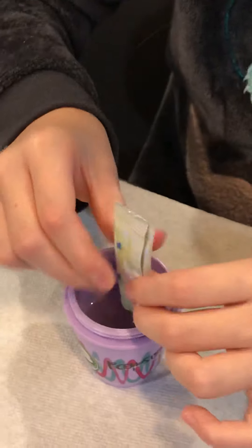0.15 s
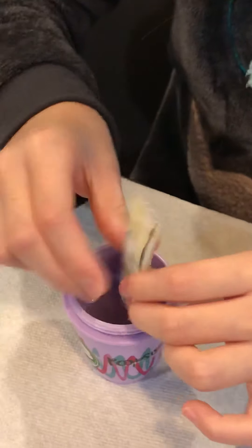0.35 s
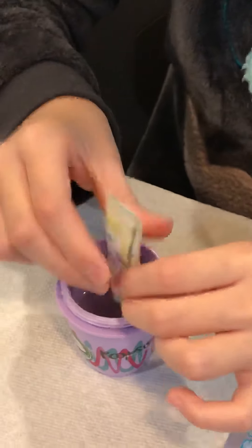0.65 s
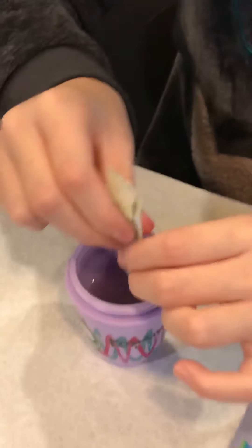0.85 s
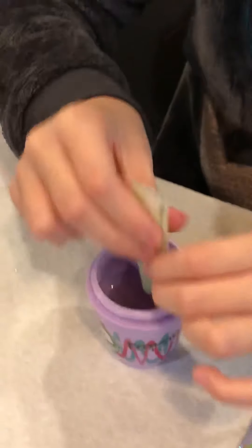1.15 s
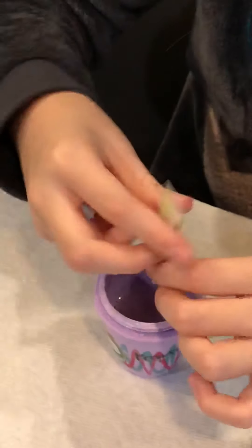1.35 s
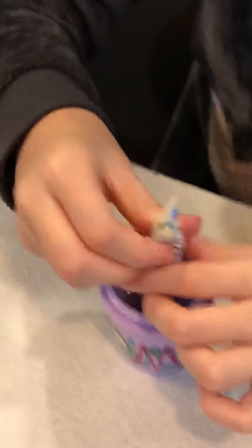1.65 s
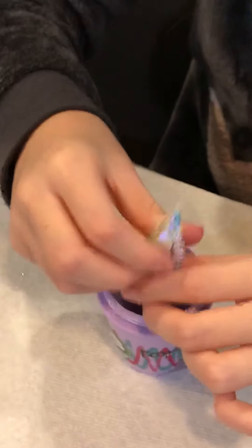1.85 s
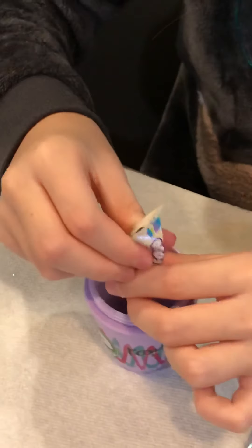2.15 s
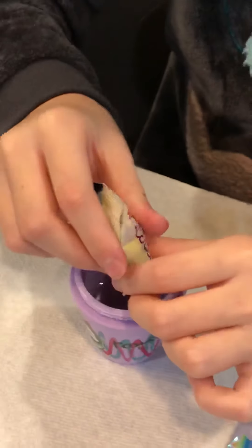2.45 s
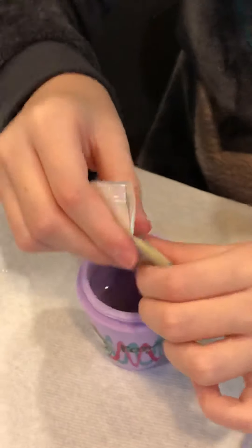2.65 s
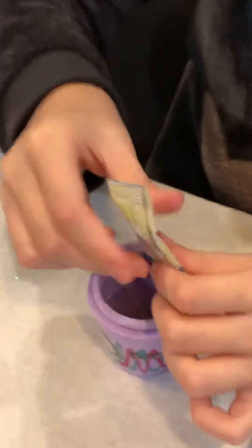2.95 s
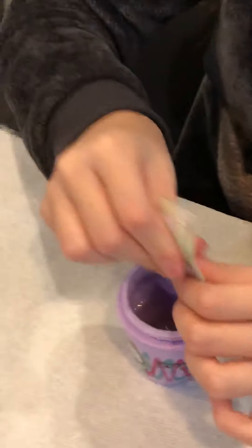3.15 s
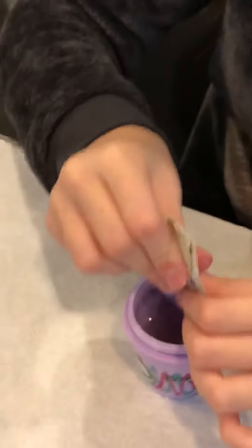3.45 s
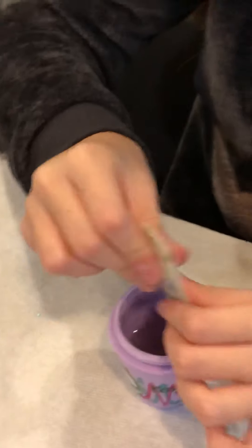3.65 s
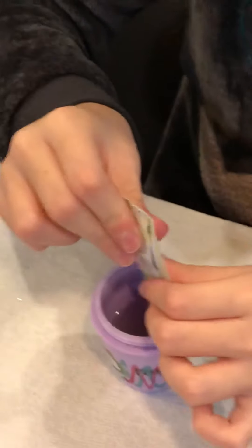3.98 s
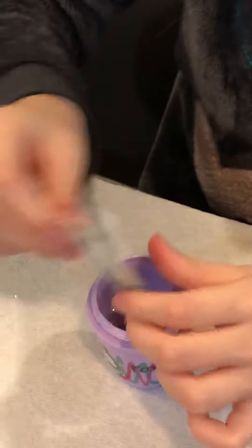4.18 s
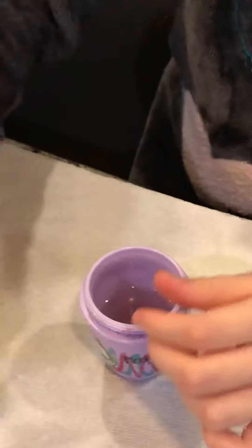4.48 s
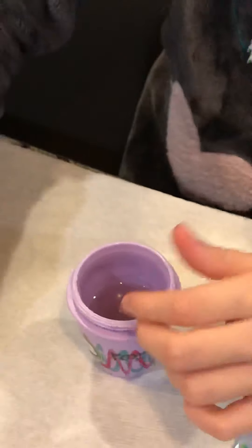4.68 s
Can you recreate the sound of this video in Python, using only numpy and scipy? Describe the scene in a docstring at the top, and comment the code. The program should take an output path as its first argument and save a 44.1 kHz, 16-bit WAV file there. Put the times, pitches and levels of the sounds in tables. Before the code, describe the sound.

Fingers squeeze a small foil sachet close to the microphone in a quiet room. It buckles in sharp, irregular snaps with fine crackling between them. The table gives a soft, dull knock. As the crinkling goes on, powder is shaken out in three very faint trickles, with one tap on a plastic cup. At the end the foil stops and the cup clicks lightly.

```python
"""A quiet room with a faint mains hum; one microphone close to a small foil sachet over a plastic cup.
From the start the sachet is squeezed: its walls buckle in sharp snaps, tiny creases crackle around them,
the foil slides under the fingers and the room rings briefly. Near 1.8 s the table gives a dull knock.
From 3 s powder is shaken out in three thin trickles, with one knock on the cup among them.
At the end the cup is nudged and clicks."""
import sys
import numpy as np
from scipy import signal
from scipy.fft import rfft, irfft, next_fast_len
from scipy.io import wavfile
from scipy.ndimage import map_coordinates

SR = 44100
rng = np.random.default_rng(int(sys.argv[2]) if len(sys.argv) > 2 else 0)


def unload_audio(sound):
    """Save the sound as a 16-bit wav file, at the path given as the first command line argument."""
    columns = np.transpose(np.atleast_2d(sound))
    # keep every value between -1 and 1, then stretch to whole-number steps
    steps = np.round(np.clip(columns, -1, 1) * 32767)
    wavfile.write(sys.argv[1], SR, steps.astype(np.int16))


N = 212383

# the foil buckles: start_s, level_db, wall_db, edge_db (both relative to the level), patch_hz
BUCKLES = [(0.0449, -45, 1, -35, 3310), (0.1659, -38, -8.5, -4, 3400), (0.2836, -50.5, -6, -5, 3300),
           (0.2959, -44.5, 2.5, -15, 3380), (.4141, -49, -1, -17, 3230), (0.4261, -38, -5, -1.5, 3000),
           (0.5518, -47, 7, -4.5, 5430), (.7097, -29.5, -12, 1.5, 3130), (0.72, -41.5, 1.5, .5, 4100),
           (.7331, -43.5, -4.5, -7, 2920), (0.8576, -39.5, 3, -2, 5400), (1.0305, -51, -2.5, -1, 2550),
           (1.0371, -28.5, -21, -2.5, 3300), (1.0438, -43.5, -1, -3, 4900), (1.0546, -34, -8, -5.5, 2880),
           (1.134, -52.5, -3, -5, 5500), (1.159, -52, -4, -3, 2300), (1.1824, -51.5, -1, -7.5, 4580),
           (1.2553, -50.5, -0.5, -22, 2580), (1.2657, -34.5, -7, 1, 5460), (1.286, -46.5, -2, 1, 3460),
           (1.4274, -53.5, 6.5, -5, 3220), (1.476, -61, 3.5, -12, 3110), (1.5567, -51.5, 4, -7, 3100),
           (1.6055, -36.5, -2.5, -9.5, 2770), (1.949, -37, -4, -4.5, 2860), (2.117, -66, 16.5, -12, 2700),
           (2.3014, -36, -3.5, -4, 2730), (2.4476, -47.5, -0.5, 5, 5100), (2.4741, -58.5, 16, -20, 2830),
           (2.6634, -49, 8, -18, 3550), (2.697, -31, -4.5, -13, 2700), (2.7987, -35, -6.5, 1.5, 2200),
           (2.822, -43.5, -1, 2, 2700), (3.0006, -45.5, -14, 1.5, 2500), (3.0205, -44, -11, -3.5, 3530),
           (3.0822, -57, -7, -4.5, 3460), (3.2183, -61.5, -20, 8.5, 3900), (3.2971, -41.5, -6, -20, 4100),
           (3.3042, -45.5, -11, 2.5, 4950), (3.406, -42, 8.5, 2.5, 4700), (3.583, -56, -3.5, -21, 3630),
           (3.606, -49, -13, -7, 3980), (3.6155, -45, -8, -10, 4070), (3.6204, -43, -2, 4, 2700),
           (3.656, -37, -10.5, -8.5, 2650), (3.7102, -43, 2.5, 1.5, 4800), (3.8707, -38.5, -7.5, -2, 3460),
           (3.892, -42, -11.5, -14, 2650), (3.9773, -40.5, -3, -5, 5130), (4.1499, -43, -13, 3, 5240),
           (4.1798, -51.5, -12, -3, 2720), (4.2279, -51, 0.5, -19, 4630), (4.2463, -55.5, 1, -18, 2800),
           (4.3887, -58, -27, -1, 5530)]
# modes of the sachet's stiff walls: pitch_hz, level_db, t60_s
FOIL_MODES = [(646, 0, 0.0024), (1026, -7.5, 0.0094), (1560, -12, 0.0095), (1796, -0.5, 0.013),
              (2700, 4, 0.0062), (3325, -4, 0.014), (4450, -8.5, 0.01), (5330, -10.5, 0.024)]


def amp(db):
    """Decibels to gain."""
    return 10 ** (np.asarray(db) / 20)


def unit(x):
    """Scale to rms 1."""
    return x / np.sqrt(np.mean(x ** 2) + 1e-20)


def along(points, hz):
    """Read (frequency_hz, value) points on a log frequency axis."""
    point_hz, values = np.transpose(points)
    return np.interp(np.log(hz + 1), np.log(point_hz + 1), values)


def filtered(x, response):
    """Filter by a gain given as a function of frequency."""
    size = next_fast_len(N + SR // 2)
    return irfft(rfft(x, size) * response(np.fft.rfftfreq(size, 1 / SR)), size)[:N]


def coloured(x, points):
    """Causal filter through (frequency_hz, gain_db) points."""
    size = 2048
    cepstrum = irfft(np.log(amp(along(points, np.fft.rfftfreq(size, 1 / SR)))))
    cepstrum[1:size // 2] *= 2  # folding gives minimum phase
    cepstrum[size // 2 + 1:] = 0
    return signal.oaconvolve(x, irfft(np.exp(rfft(cepstrum))))[:N]


def wobble(rate_hz):
    """A smooth random curve with rate_hz knots a second."""
    knots = rng.standard_normal(int(N * rate_hz / SR) + 4)
    return map_coordinates(knots, [np.arange(N) * rate_hz / SR])


def swells(rows):
    """A smooth rise and fall for each (peak_s, level_db, half_length_s)."""
    t = np.arange(N) / SR
    return sum(amp(db) * np.exp(-.5 * ((t - peak_s) / half_s) ** 2) for peak_s, db, half_s in rows)


def add(track, start_s, sound):
    """Mix a sound into the track."""
    start = max(0, round(start_s * SR))
    track[start:start + len(sound)] += sound[:len(track) - start]


def ring(modes, detune, scatter_db, crack_db, crack_t60_s):
    """One blow: a brief crack and the modes, at new strengths and slightly new pitches."""
    t = np.arange(SR // 30) / SR
    hz, db, t60 = np.transpose(modes)[:, :, None]
    pitch, size, side = rng.standard_normal((3, len(modes), 1))
    decays = amp(db + scatter_db * size - 60 * t / t60)
    tones = np.sign(side) * decays * np.sin(2 * np.pi * hz * (1 + detune * pitch) * t)
    crack = amp(crack_db - 60 * t / crack_t60_s) * rng.standard_normal(len(t))
    onset = 1 - np.exp(-t / 0.000072)  # the flip takes a moment to gather speed
    return (tones.sum(0) + crack) * onset


def voiced(blow, level_db, thud_db, wall_db, edge_db):
    """The size of the moving patch sets a blow's balance; band levels hold over its first 4 ms."""
    # thud, wall, patch and edge bands: low_hz, high_hz
    bands = [(540, 1150), (1480, 2050), (2450, 6000), (6000, 17000)]
    out = np.zeros(len(blow))
    for edges, db in zip(bands, (thud_db, wall_db, 0, edge_db)):
        band = signal.sosfilt(signal.butter(3, edges, "bandpass", fs=SR, output="sos"), blow)
        out += amp(level_db + db) * band / np.std(band[:SR // 250])
    return out


def room_tone():
    """Steady room noise and a slightly wavering mains hum."""
    # spectrum of the room noise: frequency_hz, density_db
    air_colour = [(20, -49), (45, 3), (90, 1), (170, -0.5), (280, -2.5), (450, -6), (1000, -12.5),
                  (2500, -18.5), (6000, -24.5), (15500, -27.5), (16500, -33)]
    # partials of the hum: pitch_hz, rms_db
    partials = [(58.5, -74.5), (116.5, -75), (232.5, -78)]
    t = np.arange(N) / SR
    air = unit(filtered(rng.standard_normal(N), lambda hz: amp(along(air_colour, hz))))
    hum = np.zeros(N)
    for hz, db in partials:
        peak = np.sqrt(2) * amp(db + 1.2 * wobble(5.5))
        hum += peak * np.sin(2 * np.pi * hz * t + .5 * wobble(4.11))
    return amp(-66) * air + hum


def room_tail(x):
    """The room's diffuse ring, new every quarter second as the hands move."""
    # decay of the room: frequency_hz, t60_s
    decay = [(300, 0.19), (1000, 0.34), (3000, 0.38), (7000, 0.68), (15000, 0.15)]
    # colour of the tail: frequency_hz, gain_db
    colour = [(200, -10), (1000, 11), (3000, 7), (6000, 0), (10000, -3), (16000, 8)]
    out = np.zeros(N)
    for start in range(0, N, SR // 4):
        hz, t, noise = signal.stft(rng.standard_normal(SR // 2), SR, nperseg=256)
        fade = amp(along(colour, hz)[:, None] - 60 * t / along(decay, hz)[:, None])
        onset = 1 - np.exp(-t / 0.00055)
        tail = signal.istft(noise * fade * onset, SR, nperseg=256)[1]
        add(out, start / SR, signal.fftconvolve(x[start:start + SR // 4], tail / np.linalg.norm(tail)))
    return out


def echoes(x):
    """Surfaces near the microphone answer first, a little duller."""
    # early reflections: delay_s, gain_db
    reflections = [(.0032, -22), (.0068, -21), (.0092, -28.5), (0.0106, -18.5), (0.022, -21)]
    out = np.zeros(N)
    dull = filtered(x, lambda hz: 1 / (1 + 1j * hz / 7000))
    for delay_s, db in reflections:
        add(out, delay_s, amp(db) * dull)
    return out


def knocks():
    """A soft contact sets one low mode swinging for a few cycles."""
    # dull knocks through the table and the cup: start_s, level_db, pitch_hz, t60_s
    contacts = [(1.785, -45.5, 53.3, 0.17), (3.4064, -31.5, 516, 0.012)]
    out = np.zeros(N)
    t = np.arange(SR // 3) / SR
    for start_s, db, hz, t60 in contacts:
        envelope = amp(db - 60 * t / t60) * (1 - np.exp(-2 * hz * t))
        add(out, start_s, envelope * np.sin(2 * np.pi * hz * t))
    return out


def powder():
    """Very fine grains run down inside the sachet and brush the foil with a thin, high fizz."""
    # trickles: peak_s, level_db
    trickles = [(2.998, -63), (3.145, -64), (4.14, -63)]
    half_length_s = 0.02
    grains = rng.standard_normal(N) ** 3  # cubing makes the noise spiky
    fizz = unit(filtered(grains, lambda hz: np.exp(-.5 * ((hz - 14800) / 2200) ** 2)))
    return fizz * swells([(peak_s, db, half_length_s) for peak_s, db in trickles])


def cup_clicks():
    """The light plastic cup clicks as the hand shifts on it."""
    # nudges: start_s, level_db, wall_db (relative to the level)
    nudges = [(4.5888, -67, 5), (4.7174, -35.5, -17), (4.7553, -43.5, -17)]
    # modes of the rim and wall: pitch_hz, level_db, t60_s
    cup_modes = [(780, -15, 0.031), (1186, -11, 0.019), (1830, -21, 0.015), (2500, -13, 0.014),
                 (3220, 0, 0.016), (3460, 1, 0.0095), (4370, -11, 0.0091), (7560, -11, 0.0042)]
    out = np.zeros(N)
    for start_s, level_db, wall_db in nudges:
        blow = ring(cup_modes, detune=0.0056, scatter_db=1.5, crack_db=-11.5, crack_t60_s=0.0077)
        add(out, start_s, voiced(blow, level_db, thud_db=wall_db - 1.5, wall_db=wall_db, edge_db=-16))
    return out


def creases(per_second, spread_db):
    """Countless tiny creases flip, a few much larger than the rest, in several colours; rms 1."""
    colours = 20
    chance, size, kind = rng.random(N), rng.exponential(size=N), rng.random(N)
    flips = (chance < per_second / SR) * amp(spread_db * np.minimum(size, 2.5))
    out = np.zeros(N)
    for colour in range(colours):
        tick = ring(FOIL_MODES, detune=0.065, scatter_db=8.0, crack_db=11.5, crack_t60_s=0.0098)
        out += signal.oaconvolve(flips * (np.floor(colours * kind) == colour), tick)[:N]
    return unit(out)


def strain(rise_s, fall_s):
    """Stress builds before each buckle and settles after it, more so the further the wall swings."""
    wall_share = 0.15
    out = np.zeros(N)
    t = np.arange(-(SR // 12), SR // 12) / SR
    swell = np.exp(np.minimum(t / rise_s, -t / fall_s))
    for start_s, level_db, wall_db, *_ in BUCKLES:
        add(out, start_s + t[0], amp(level_db + wall_share * wall_db) * swell[t >= -start_s])
    return out


def rustle():
    """Sparse crackle as the foil is worked and settles, dense crackle as it slides and gives way."""
    # how hard the fingers work the sachet: time_s, level_db
    handling = [(0, -59.5), (.65, -83), (1.1, -62), (1.65, -60.5), (1.85, -70.5), (2.2, -70.5), (2.5, -57),
                (2.92, -68.5), (3.5, -62), (4.25, -67.5), (4.5, -78), (4.55, -100)]
    # foil sliding under the fingers: peak_s, level_db, half_length_s
    slides = [(.007, -57.5, 0.048), (.161, -42.5, 0.0064), (.548, -55, 0.015), (.853, -52, 0.0066),
              (1.15, -61, 0.0078), (1.27, -50, 0.01), (1.445, -52.5, 0.0082), (1.904, -58, 0.0024),
              (1.945, -52, 0.01), (2.292, -51.5, 0.01), (2.47, -49.5, 0.0063), (2.658, -51.5, 0.0068),
              (2.999, -53.5, 0.0085), (3.121, -56, 0.0085), (3.303, -48, 0.0094), (3.396, -53.5, 0.0056),
              (3.7, -49, 0.007), (3.862, -53, 0.01), (4.13, -58, 0.019), (4.26, -55.5, .04),
              (4.309, -45, 0.0044), (4.442, -55.5, .0032)]
    handling_db = np.interp(np.arange(N) / SR, *np.transpose(handling))
    working = amp(handling_db + 0.54 * wobble(14) - 7.0)
    settling = amp(-19.5) * strain(rise_s=0.0047, fall_s=0.014)
    sliding = amp(-0.5) * swells(slides)
    giving_way = amp(-11) * strain(rise_s=0.0034, fall_s=0.0064)
    sparse = (working + settling) * creases(per_second=110, spread_db=8.0)
    dense = (sliding + giving_way) * creases(per_second=650, spread_db=4.0)
    return sparse + dense


def snaps(crack_db, wall_gain_db):
    """Each buckle rings the flipping patch and the sachet, whose shape changes a little every time."""
    thud_loss = 0.19  # dB of thud lost per dB that a buckle is harder than usual
    usual_db = np.mean(BUCKLES, axis=0)[1]
    out = np.zeros(N)
    for start_s, level_db, wall_db, edge_db, patch_hz in BUCKLES:
        modes = FOIL_MODES + [(patch_hz, 9, 24 / patch_hz)]  # small, high patches die sooner
        blow = ring(modes, detune=0.0056, scatter_db=0.5, crack_db=crack_db, crack_t60_s=0.0076)
        thud_db = wall_db - 8 - thud_loss * (level_db - usual_db)  # follows the wall's swing
        add(out, start_s, voiced(blow, level_db, thud_db, wall_db + wall_gain_db, edge_db))
    return amp(1.46) * out


def scene():
    """Close up, in mono. The foil radiates a different colour each way; the room blends them."""
    # colour of the foil on the side facing the microphone: frequency_hz, gain_db
    facing = [(1000, -1), (3350, -2.5), (3900, 2), (5300, 2), (6900, -0.5), (8100, 4.5), (9000, -1.5),
              (9800, -0.5), (10700, -5), (12200, -1.5), (12800, -0.5), (13900, -1), (15400, -3)]
    front = snaps(crack_db=8.5, wall_gain_db=0.15)
    left, right = [snaps(crack_db=13.5, wall_gain_db=-3.5) for side in "LR"]
    crackle = rustle()
    taps = cup_clicks() + knocks()
    near = coloured(front + crackle, facing) + taps + powder()
    far = room_tail(front + amp(4.0) * crackle + amp(1.5) * taps) + room_tail(left) + room_tail(right)
    return (near + echoes(near) + amp(-21.0) * far + room_tone())[None]


def record(dry):
    """The recorder cuts off steeply above its band limit."""
    top_hz = 16100
    return filtered(dry[0], lambda hz: 1 / np.sqrt(1 + (hz / top_hz) ** 120))[None]


dry = scene()
out = record(dry)
unload_audio(out)
```